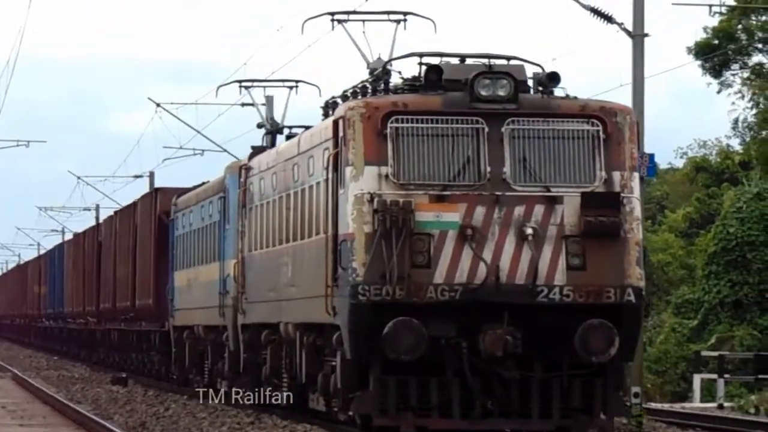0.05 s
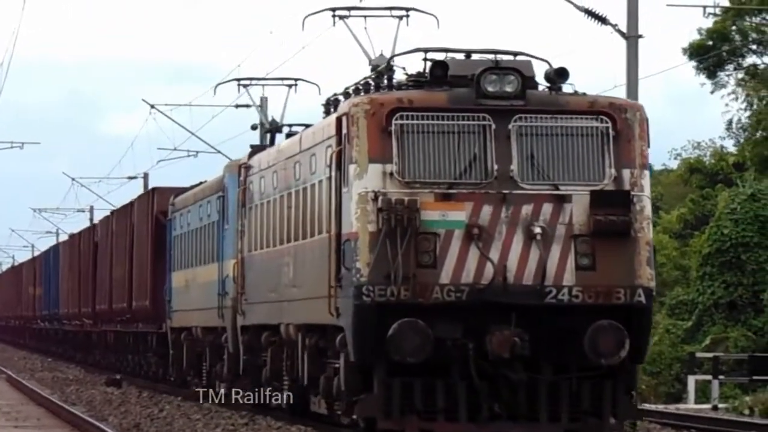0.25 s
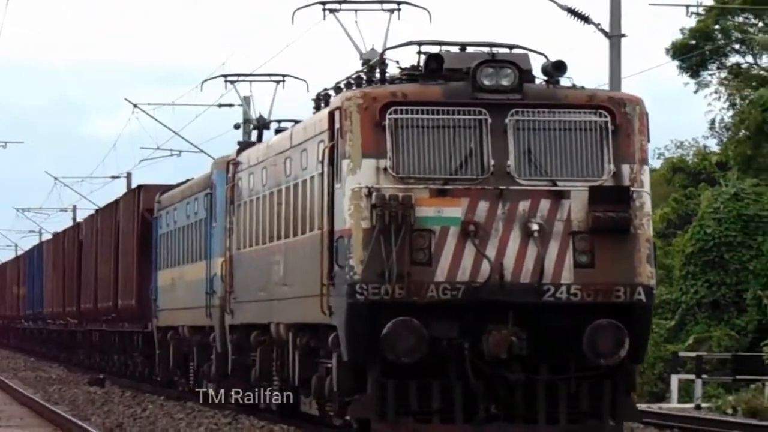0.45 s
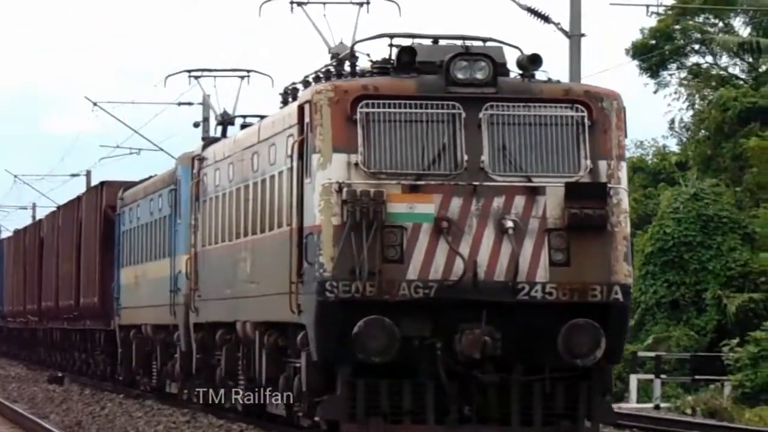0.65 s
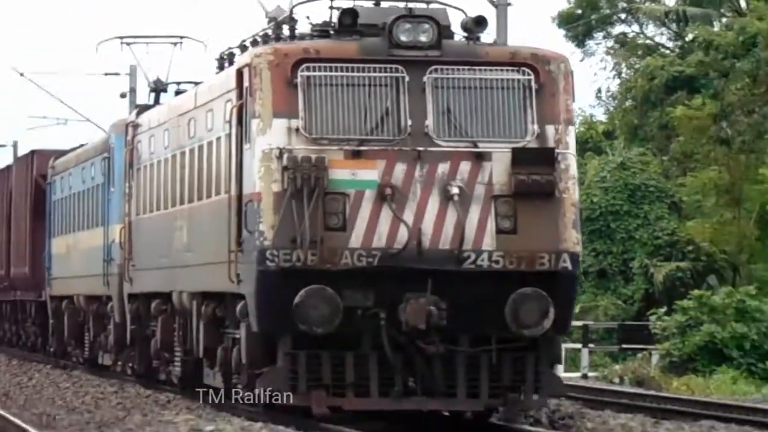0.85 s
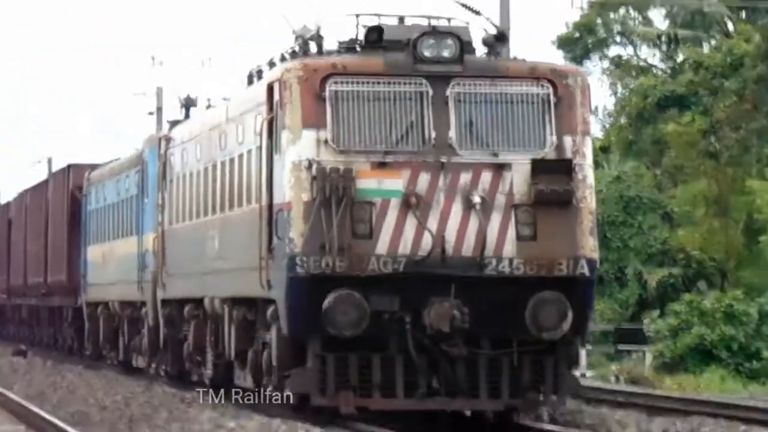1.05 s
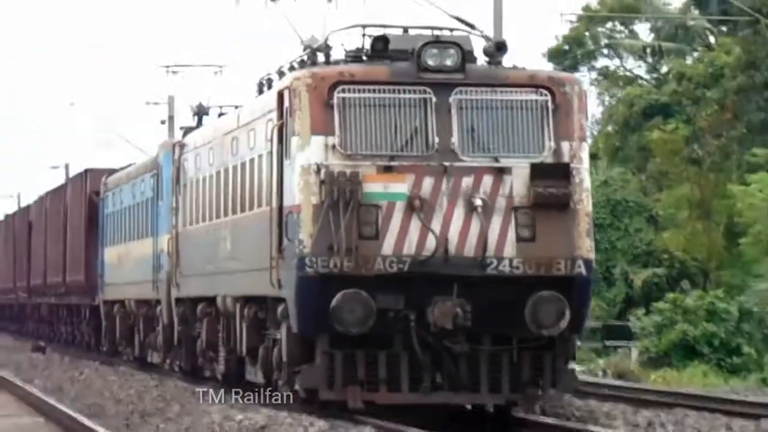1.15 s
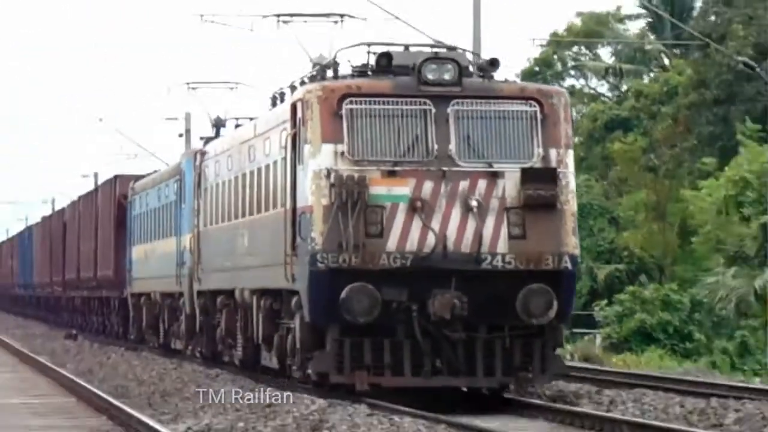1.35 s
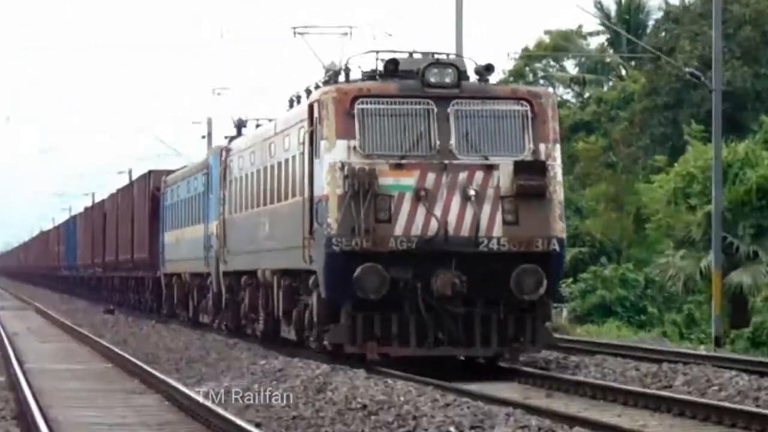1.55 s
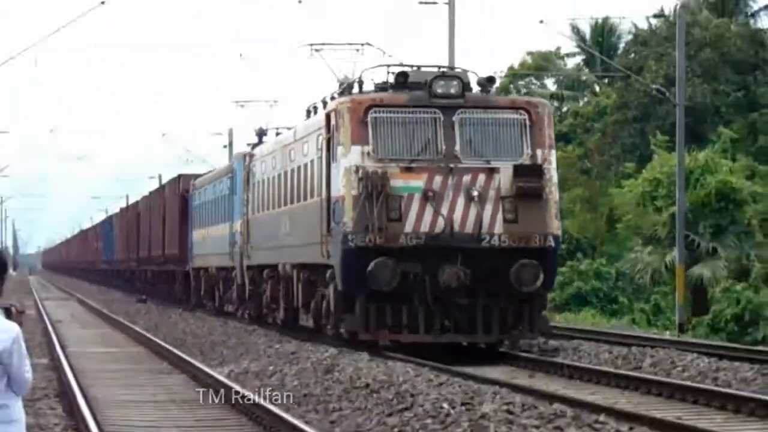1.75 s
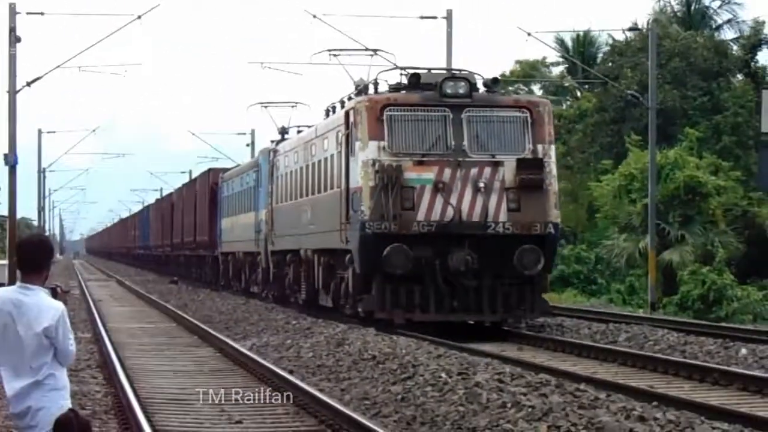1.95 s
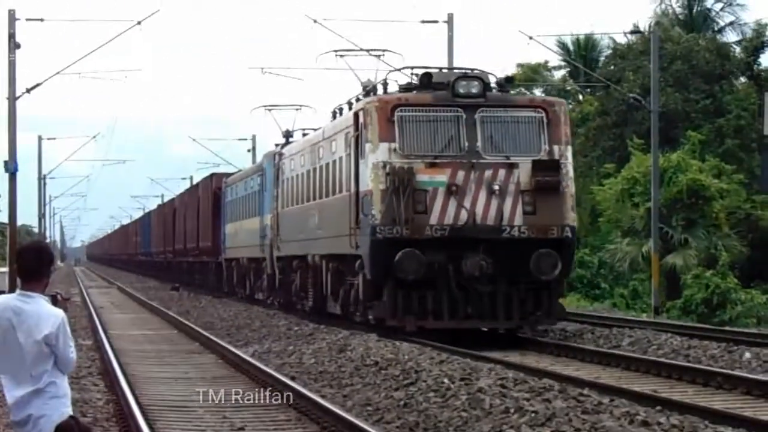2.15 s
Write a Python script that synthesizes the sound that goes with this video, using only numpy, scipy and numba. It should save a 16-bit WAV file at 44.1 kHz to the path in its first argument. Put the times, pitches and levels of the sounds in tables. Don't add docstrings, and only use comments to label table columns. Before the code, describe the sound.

A loud, brassy locomotive air horn toots four times, then holds a longer note outdoors

```python
import sys
import numpy as np
from scipy import signal
from scipy.fft import rfft, irfft, next_fast_len
from scipy.io import wavfile
from numba import njit

SR = 44100
rng = np.random.default_rng(int(sys.argv[2]) if len(sys.argv) > 2 else 0)


def dump(signal):
    limited = np.clip(np.atleast_2d(signal).T, -1, 1)
    pcm = np.round(limited * 32767).astype(np.int16)
    wavfile.write(sys.argv[1], SR, pcm)


def how_loud(loudness_db):
    steps = np.asarray(loudness_db, float) / 20
    return 10 ** steps


N = 97020
LEAD = SR
STEP = 32


def times():
    return (np.arange(N + LEAD) - LEAD) / SR


def curve(points, at):
    return np.interp(at, *np.transpose(points))


def along(points, hz):
    f, v = np.transpose(points)
    return np.interp(np.log(hz + 1), np.log(f + 1), v)


def unit(x):
    return x / np.sqrt(np.mean(x ** 2) + 1e-20)


def wobble(rate, count=1, step=1):
    at = np.arange(0, N + LEAD, step) * rate / SR
    knots = rng.standard_normal((count, int(at[-1]) + 2))
    return np.array([np.interp(at, np.arange(len(row)), row) for row in knots])


def noise(spectrum):
    m = next_fast_len(N + LEAD)
    white = rfft(rng.standard_normal(m))
    colour = how_loud(along(spectrum, np.fft.rfftfreq(m, 1 / SR)))
    return unit(irfft(white * colour, m)[:N + LEAD])


def echoes(x, decay, wait_s, rise_s=0.0028, dull_hz=20000):
    hz, t, grains = signal.stft(rng.standard_normal(2 * SR), SR, nperseg=256)
    fall = how_loud(-60 * t / along(decay, hz)[:, None])
    rise = 1 - np.exp(-t / rise_s)
    shape = fall * rise / (1 + (hz[:, None] / dull_hz) ** 2)
    tail = signal.istft(grains * shape, SR, nperseg=256)[1]
    late = np.pad(x, (round(wait_s * SR), 0))
    return signal.fftconvolve(late, tail / np.linalg.norm(tail))[:len(x)]


# frequency in Hz, level in dB per Hz.
TRAIN_COLOUR = [(20, -23), (50, -5), (75, -13), (140, -30), (230, -15.5), (450, -29), (2000, -35.5),
                (14000, -59.5)]
# time in seconds, hum level in dB.
HUM_LOAD = [(0, 1.5), (.5, 1), (.75, -1), (1.08, -14), (1.5, 2), (2.2, 1)]


def train():
    hum_hz = 49.2 + 1.6 * wobble(8.7)[0]
    hum = np.sqrt(2) * np.sin(2 * np.pi * np.cumsum(hum_hz) / SR)
    hum = hum * how_loud(-3 + curve(HUM_LOAD, times()) + 1.7 * wobble(8.9)[0])
    rumble = how_loud(1.6 * wobble(6.02)[0]) * noise(TRAIN_COLOUR)
    return how_loud(-54.5) * (rumble + hum)


# frequency in Hz, time to fall by 60 dB in seconds.
LAND_DECAY = [(300, 2.47), (1500, 2.03), (5000, 1.34), (14000, 0.89)]


def countryside(sent):
    return how_loud(-26) * echoes(sent, LAND_DECAY, wait_s=.1, rise_s=0.084, dull_hz=10900)


def hill(sent):
    hill_hz = 890
    band = signal.butter(1, [hill_hz / 1.25, hill_hz * 1.22], "bandpass", fs=SR)
    return how_loud(-19.5) * echoes(signal.lfilter(*band, sent), [(300, 0.13), (5000, 0.12)], wait_s=.79)


# frequency in Hz, level in dB per Hz.
PUFF_COLOUR = [(590, -36), (1000, -10), (1560, -6.5), (1900, -27), (3020, 1), (4110, -19.5), (9200, -20.5),
               (14000, -21)]


def puff():
    full_s, rise_s, end_s = 0.191, 0.017, 0.23
    t = times()
    rise_db = -12 * np.clip((full_s - t) / rise_s, 0, 9) ** 2
    end_db = -1000 * np.clip(t - end_s, 0, 1)
    return how_loud(-45.5 + rise_db + end_db) * noise(PUFF_COLOUR)


# opening in seconds, closing in seconds, level in dB,
# release stretch (times), build-up stretch (times).
BLASTS = [
    (-.95, -.82, 0, 1, 1.025),
    (-.68, -.5, 0, 1, 1),
    (.217, .293, .5, 1.2, 0.51),
    (.518, .647, 1, 1.08, 1.31),
    (.78, .914, 0, 1.1, 1.2),
    (1.049, 1.165, 0, 1.05, 1.35),
    (1.323, 1.898, 0, 1.02, 1.38),
]
# seconds from opening, dB lost by the fundamental.
BUILD_UP = [(-.08, 47.5), (-.035, 14), (-.012, 6), (-.003, 4), (.003, 0.46), (0.019, 0)]
# seconds from closing, dB lost by the fundamental.
DRAIN_AWAY = [(0, 0), (.02, 0.81), (.045, 3), (0.101, 7), (.125, 10), (.15, 20.5), (.3, 72.5)]


def valve(t):
    lack = []
    for opens, closes, _, slow, lazy in BLASTS:
        lack.append(curve(BUILD_UP, (t - opens) / lazy) + curve(DRAIN_AWAY, (t - closes) / slow))
    which, lack_db = np.argmin(lack, axis=0), np.min(lack, axis=0)
    opened, _, level_db, *_ = np.transpose(BLASTS)[:, which]
    settle_hz = 3.5 * np.exp(-np.abs(t - opened) / .045)
    scoop_hz = 18 * (t < opened + .02) * np.tanh(lack_db / 7.5)
    slack_hz = 9 * (1 - np.exp(-lack_db / 3))
    jitter_hz = 0.65 * wobble(40, step=STEP)[0]
    pitch = 302.74 + np.maximum(slack_hz, settle_hz + scoop_hz) + jitter_hz
    return lack_db, level_db, pitch


# frequency in Hz, width in Hz, level in dB.
BELL = [(300, 196, -1.5), (626, 265, -3), (1230, 680, -3.5), (2360, 1560, -10.5)]


def shock_in_bell(f):
    shock_hz, steepness = 1586, 0.76
    shape = (1 + 1j * f / shock_hz) ** -steepness
    for c, width, db in BELL:
        shape = shape + how_loud(db) * 1j * f * width / (c * c - f * f + 1j * f * width)
    return -shape


# time in seconds, delay in ms, phase turn in radians, level in dB.
BOUNCE = [(.2, 0.4, 2.07, -2), (.55, 0.4085, 1.33, -5.5), (.9, 0.43, 1.42, -4.5), (1.1, 0.472, 2.26, -4.5),
          (1.4, 0.543, 2.47, -5.5), (1.65, 0.571, 2.34, -3), (1.9, 0.61, 2.62, -4.5)]
# delay in ms, level in dB, frequency in Hz above which it is dull.
NEAR = [(1.192, -0.5, 650), (2.612, 2.5, 1010), (1.67, -15, 18000), (2.2, -15, 12000), (4.6, -16, 18000),
        (8.9, -17, 18000), (13.7, -18.5, 14000)]


def nearby_paths(f, t):
    s, *columns = np.transpose(BOUNCE)
    delay_ms, turn, bounce_db = [np.interp(t, s, c) for c in columns]
    bounce = how_loud(bounce_db) * np.exp(1j * (turn - 2 * np.pi * f * delay_ms / 1000))
    paths = 1 + bounce / (1 + (f / 16000) ** 2)
    drift = 1 + 0.024 * (t - 1)
    for ms, db, dull_hz in NEAR:
        late = np.exp(-2j * np.pi * f * ms * drift / 1000)
        paths = paths + how_loud(db) * late / (1 + (f / dull_hz) ** 2)
    return paths


@njit
def overtones(turns, sizes, step):
    out = np.zeros(len(turns))
    for n in range(len(turns)):
        i, u = divmod(n, step)
        base = spin = np.exp(1j * turns[n])
        for k in range(sizes.shape[1]):
            size = sizes[i, k] + (sizes[i + 1, k] - sizes[i, k]) * (u / step)
            out[n] += (spin * size).real
            spin = spin * base
    return out


def horn():
    horn_db, breath_db = -36, -26
    t = times()[::STEP]
    k = np.arange(1, 48)[:, None]
    lack_db, level_db, pitch = valve(t)
    f = k * pitch
    shimmer_db = 1.48 * np.sqrt(k / 20) * wobble(14, count=len(k), step=STEP)
    lost_db = lack_db * k ** 0.65
    sent_sizes = shock_in_bell(f) * how_loud(horn_db + level_db - lost_db + shimmer_db)
    heard_sizes = sent_sizes * nearby_paths(f, t)
    turns = 2 * np.pi * np.cumsum(np.interp(times(), t, pitch)) / SR
    sent, heard = [overtones(turns, np.pad(z.T, ((0, 1), (0, 0)), "edge"), STEP)
                   for z in (sent_sizes, heard_sizes)]
    breath_level = how_loud(horn_db + breath_db - 2.5 * np.interp(times(), t, lack_db))
    breath = breath_level * noise([(400, -8), (1200, -9.5), (14000, -6.5)])
    return sent, heard + 3 * breath * (1 + np.abs(unit(sent)))


# frequency in Hz, time to fall by 60 dB in seconds.
CUTTING_DECAY = [(300, 0.19), (2000, 0.2), (12000, 0.25)]


def cutting(sent):
    return how_loud(-14) * echoes(sent, CUTTING_DECAY, wait_s=.012)


def scene():
    sent, heard = horn()
    answers = countryside(sent) + hill(sent) + cutting(sent)
    return (train() + answers + puff() + heard)[None, LEAD:]


# time in seconds, ms repeated (below zero: skipped).
SLIPS = [(.58, .025), (0.663, 0.2), (.85, 0.012), (.929, 1.55), (1.173, 1.62), (1.49, .025), (1.652, .05),
         (1.926, -.025), (1.993, -0.27)]


def clock_slips(x, t):
    for s, ms in SLIPS:
        fade = np.clip((t - s) * 1000 / 6.1 + .5, 0, 1)
        x = x * (1 - fade) + fade * np.roll(x, round(ms * SR / 1000), axis=1)
    return x


# time in seconds, gain in dB.
GAIN = [(0, 8.5), (.225, 11), (.255, 7.5), (.272, 0), (.36, -1), (.5, -0.5), (1.05, 0.5), (1.9, -1),
        (2.2, 5)]


def camera(x, t):
    clip, knee, top_hz = 0.8, 5, 14400
    x = x * how_loud(curve(GAIN, t))
    x = x / (1 + np.abs(x / clip) ** knee) ** (1 / knee)
    return irfft(rfft(x) / (1 + (np.fft.rfftfreq(N, 1 / SR) / top_hz) ** 110), N)


def low_pass(x):
    return signal.sosfilt(signal.butter(12, 15260, fs=SR, output="sos"), x)


def record(dry):
    t = np.arange(N) / SR
    mix = camera(clock_slips(dry, t), t)
    return low_pass(mix)


dry = scene()
out = record(dry)
dump(out)
```